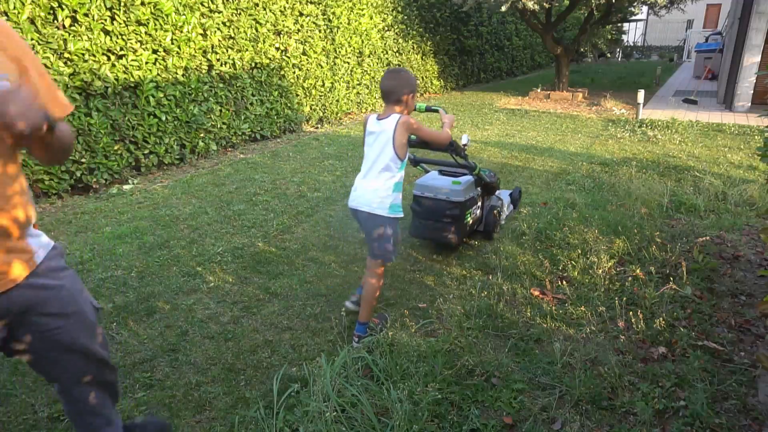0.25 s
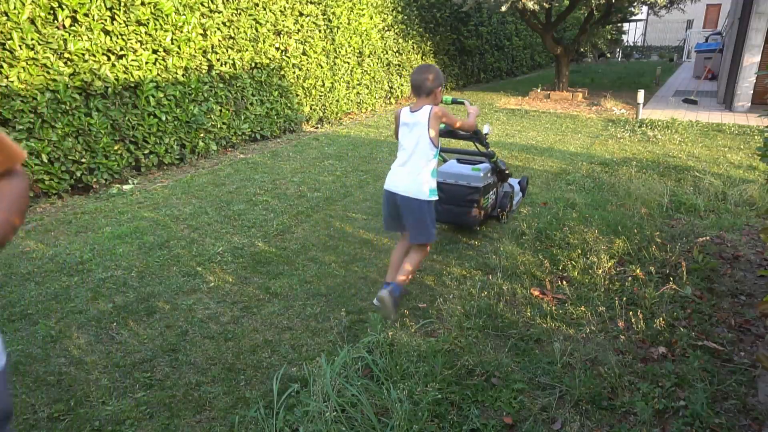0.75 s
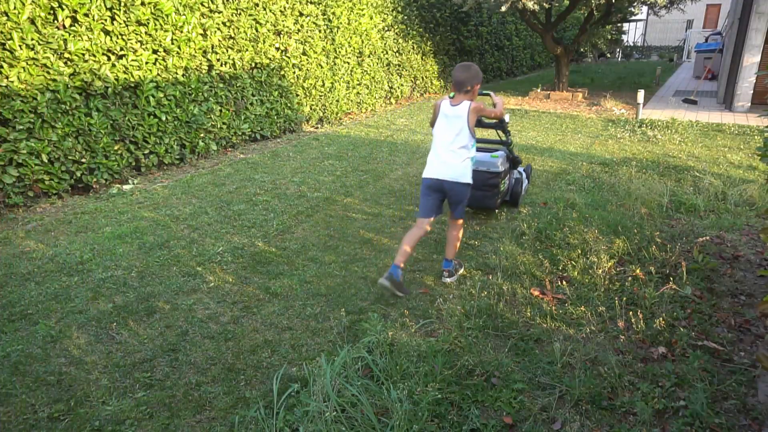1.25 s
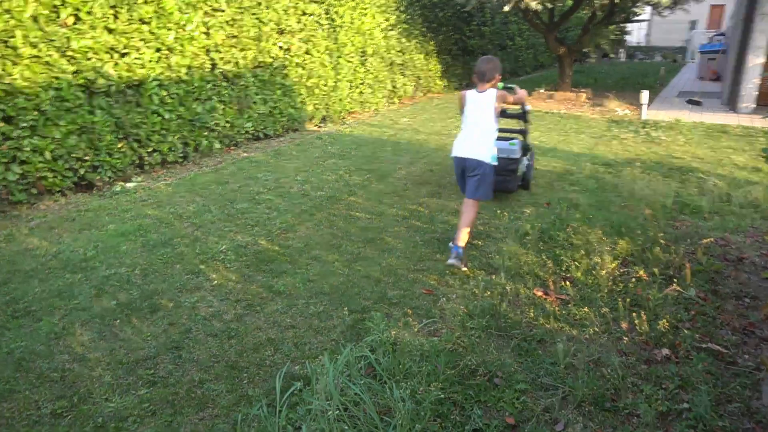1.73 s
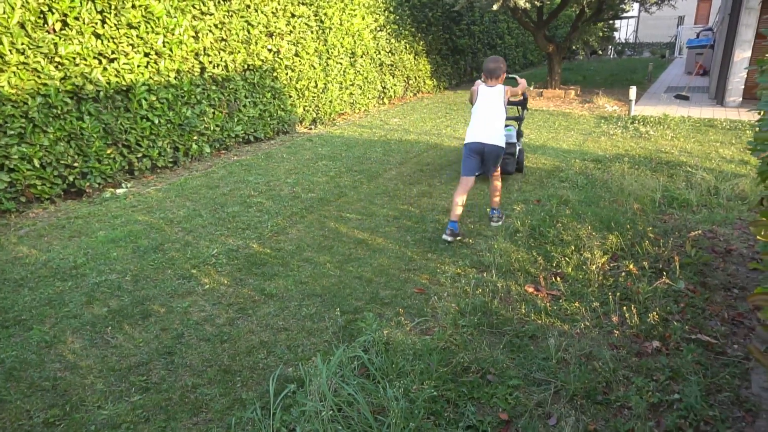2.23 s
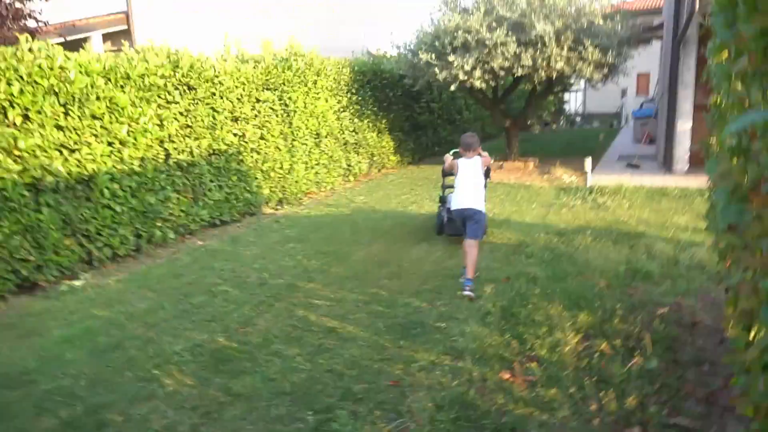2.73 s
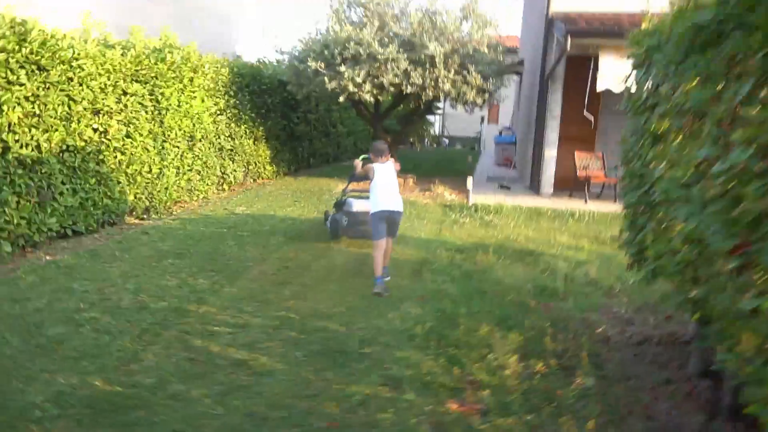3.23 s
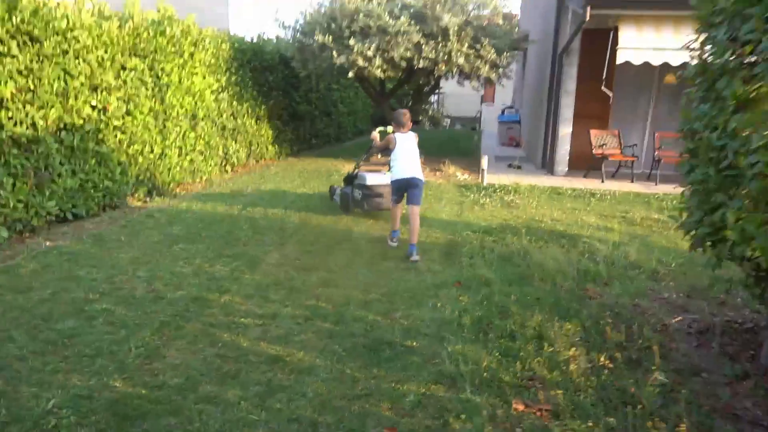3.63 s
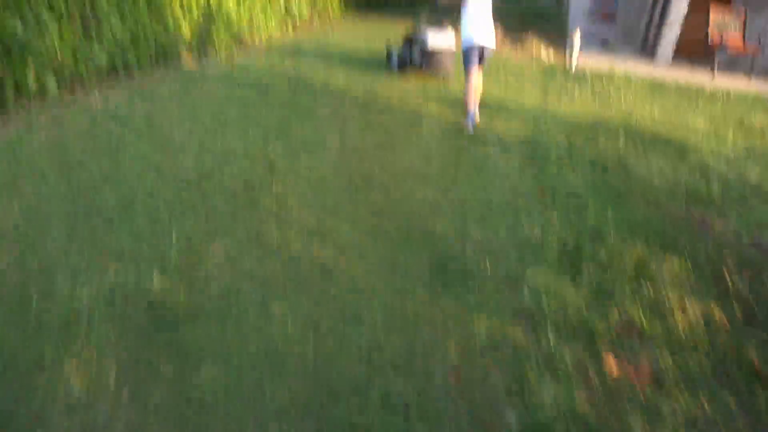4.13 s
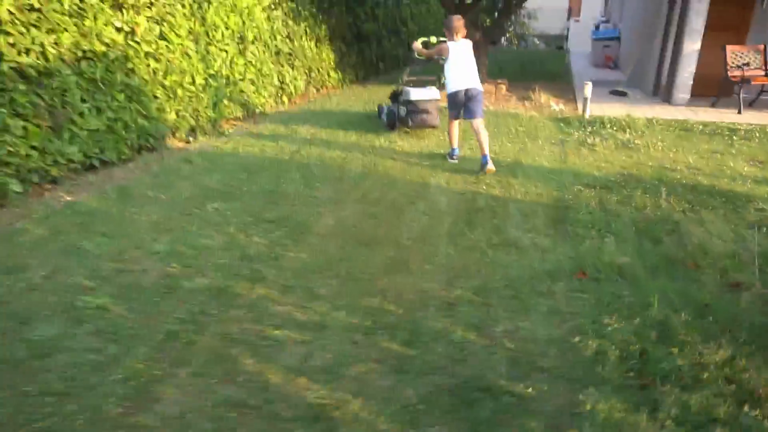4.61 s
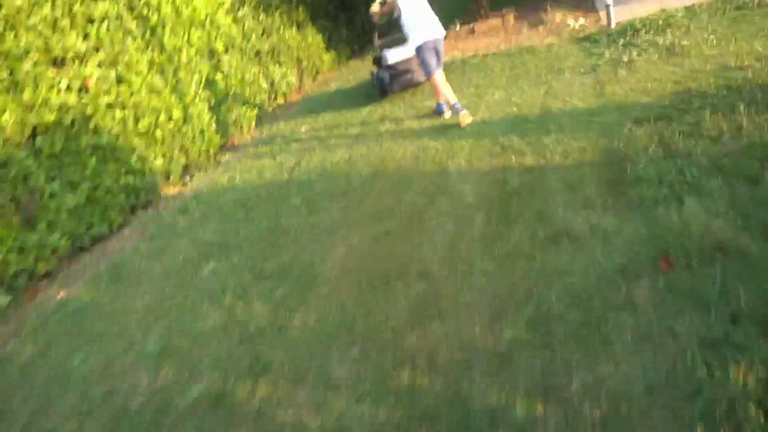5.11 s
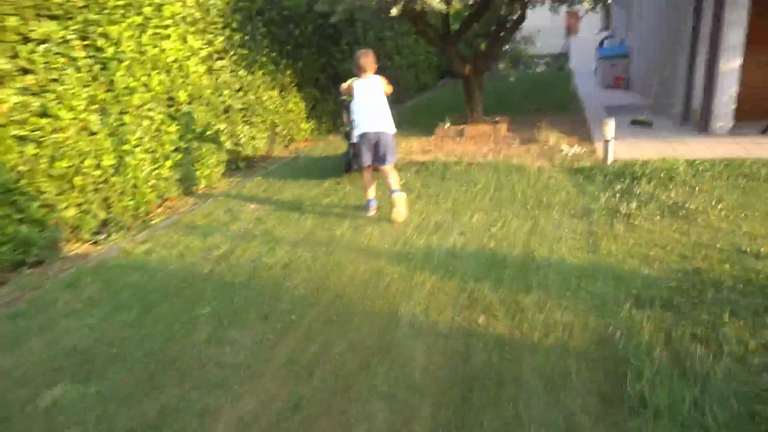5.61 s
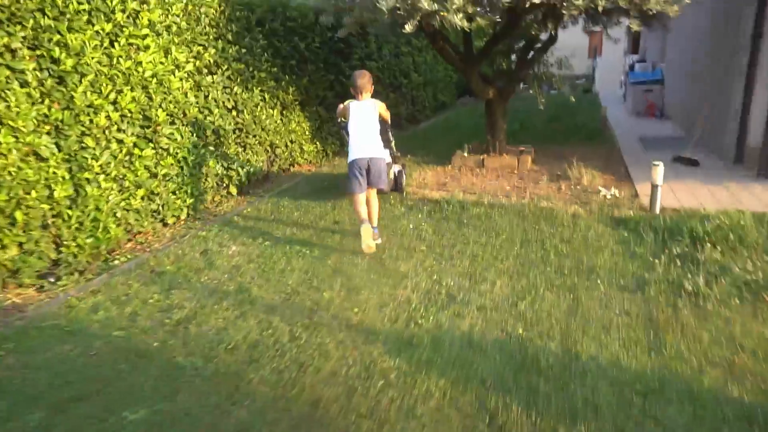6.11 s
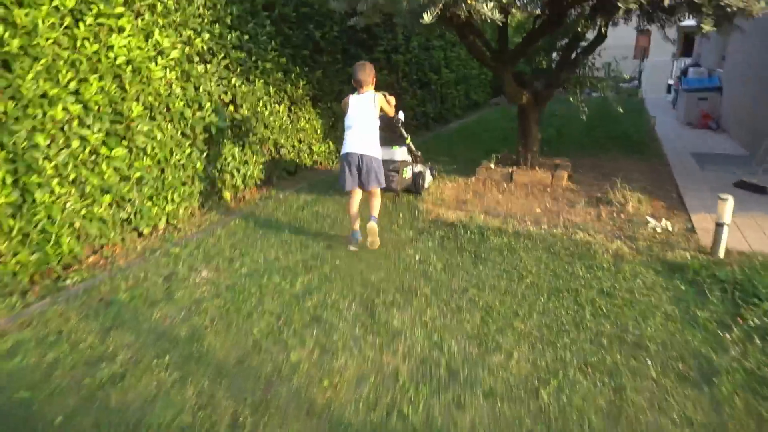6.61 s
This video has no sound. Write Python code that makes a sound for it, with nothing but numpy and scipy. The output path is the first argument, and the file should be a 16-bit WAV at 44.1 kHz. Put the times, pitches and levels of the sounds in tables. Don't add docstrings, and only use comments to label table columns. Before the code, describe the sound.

A battery lawn mower hums steadily across grass while footsteps swish behind it, a twig snaps, and wind thumps the bare microphone.

```python
import sys
import numpy as np
from scipy import signal
from scipy.fft import rfft, irfft, next_fast_len
from scipy.io import wavfile
from scipy.ndimage import uniform_filter1d

SR = 44100
rng = np.random.default_rng(int(sys.argv[2]) if len(sys.argv) > 2 else 0)


def nominal_scale(level):
    x = np.asarray(level, float) / 20
    return 10 ** x


def output_pcm(signal):
    pcm = np.clip(np.atleast_2d(signal).T, -1, 1) * 32767
    wavfile.write(sys.argv[1], SR, np.round(pcm).astype(np.int16))


N = 302251
T = np.arange(N) / SR

# time_s, deck_nearness_db, outlet_db (how openly it faces the camera)
MOWER_PATH = [(0.0, -25.5, -27), (1.03, -25.5, -27.5), (1.37, -25, -28), (1.83, -26, -29.5),
              (2.17, -27, -30.5), (2.42, -28.5, -31.5), (2.59, -28, -32.5), (3.18, -29.5, -33.5),
              (3.43, -28.5, -32), (3.59, -29, -32), (3.91, -29, -33), (4.56, -29.5, -33),
              (4.84, -28.5, -33), (5.19, -29, -31.5), (5.42, -27.5, -31), (5.8, -28.5, -32.5),
              (6.49, -29.5, -31), (6.85, -30.5, -29.5)]


def level(x):
    return x / np.sqrt(np.mean(x ** 2))


def columns(table):
    time_s, *rest = np.vstack(table).T
    return [np.interp(T, time_s, column) for column in rest]


def colour(x, points):
    hz, db = np.transpose(points)
    size = next_fast_len(N)
    bin_hz = np.arange(size // 2 + 1) * SR / size
    gain = nominal_scale(np.interp(np.log(bin_hz + 1), np.log(hz), db))
    return level(irfft(rfft(x, size) * gain, size)[:N])


def ring(x, hz, width_hz):
    b, a = signal.iirpeak(min(hz, .45 * SR), hz / width_hz, fs=SR)
    return signal.lfilter(b, a, x)


def walk(rate):
    hold = int(SR / rate)
    steps = np.repeat(rng.standard_normal(N // hold + 1), hold)
    return level(uniform_filter1d(uniform_filter1d(steps, hold), hold)[:N])


def burst(at, t60):
    return (T >= at) * nominal_scale(-60 * np.maximum(T - at, 0) / t60)


def swells(rows, edge):
    t = T[::64]
    humps = sum(height * np.exp(-np.abs(2 * (t - s) / length) ** edge) for s, length, height in rows)
    return np.interp(T, t, humps)


def grains(rate, spread_db):
    chance = rng.random((2, N))
    size_db = spread_db * np.minimum(-np.log(chance[1]), 3)
    hits = chance[0] < rate / SR
    return level(hits * nominal_scale(size_db) * np.clip(rng.standard_normal(N), -1.2, 1.2))


def patchy(x, depth_db, width_bins, hold_frames):
    strips = signal.stft(x, nperseg=1024)[2]
    field = rng.standard_normal(strips.shape)
    for way, reach in enumerate((width_bins, hold_frames)):
        field = uniform_filter1d(uniform_filter1d(field, reach, axis=way), reach, axis=way)
    return signal.istft(strips * nominal_scale(depth_db * level(field)), nperseg=1024)[1][:N]


def mower():
    # centre_s, length_s, level_db
    first_beats = [
        (2.4, 0.2, 1),
        (2.96, 0.47, -2),
        (3.73, 0.043, -12),
        (3.95, 0.51, 1.5),
        (5.0, 0.42, 2.5),
        (5.95, 1, -5),
        (6.62, 0.53, -24),
    ]
    second_beats = [(.15, 0.35, 2), (.36, 0.15, -2), (.85, 0.61, 2.5), (1.2, 0.11, -1), (1.7, 0.33, 2.5),
                    (2.15, 0.11, 0.5), (2.37, 0.32, -2), (2.65, 0.11, -5), (3.0, 0.29, -5.5),
                    (3.39, 0.085, 5), (3.64, 0.12, 5.5), (4.27, 0.095, 7), (4.48, 0.065, 2),
                    (4.69, .12, -2), (4.95, 0.13, 2.5), (5.25, .12, 0), (5.47, 0.1, -3.5), (5.61, 0.098, 2),
                    (5.73, 0.11, 3.5), (5.88, .09, -6), (5.98, .12, 5.5), (6.09, .08, -3), (6.22, 0.12, 5),
                    (6.35, .06, -1), (6.41, 0.073, 2.5), (6.7, 0.41, 4.5)]
    third_beats = [(.11, .15, 9), (.62, 0.25, 10.5), (1.0, 0.26, 7), (1.2, 0.092, -9), (1.5, 0.46, 6),
                   (1.9, 0.18, 8), (2.1, .12, 5), (2.38, .18, -1), (2.53, 0.11, 12), (3.2, 0.59, 3),
                   (3.65, 0.11, 2), (4.0, 0.57, -6), (5.17, .08, -7), (5.8, 0.11, -18), (6.07, .07, -11),
                   (6.17, 0.16, 10), (6.72, 0.15, 12)]
    fourth_beats = [(.78, .12, 7), (1.09, 0.13, 9), (1.33, 0.16, 11), (1.9, 0.064, 16), (2.12, 0.13, 6),
                    (2.47, 0.34, 12), (2.88, 0.053, 16), (3.63, 0.18, 14.5), (4.9, 1, 8), (5.5, 0.66, 6.5),
                    (5.99, 0.091, 8), (6.36, 0.28, 12.5), (6.62, 0.067, 14), (6.85, .11, 12)]
    fifth_beats = [
        (.3, 0.61, 5.5),
        (1.0, .3, -1),
        (1.5, 0.093, 12),
        (1.8, .2, 11),
        (2.4, .15, 9),
        (2.9, .3, 8),
        (3.2, 0.11, 13),
        (4.0, .15, 4),
        (4.9, 0.75, 7),
        (6.5, .6, 4),
    ]
    # multiple of the blade rate, level_db against the deck air
    overtones = [(6, -17.5), (7, -20), (8, -32), (9, -22), (10, -22), (13, -26), (30, -40)]
    # pitch_hz, density_db
    deck_spectrum = [(35, -36), (62, -18), (140, -13), (260, -8.5), (450, -12), (800, -14), (1000, -30.5),
                     (1500, -87)]
    # pitch_hz, density_db
    outlet_spectrum = [(400, -58), (750, -15), (900, 0), (1020, 1), (1400, -3), (1900, -10.5), (2200, -10),
                       (2550, -14), (2800, -22.5), (4500, -42)]
    blade_hz = 99.78
    deck_db, outlet_db = columns(MOWER_PATH)

    first_db = deck_db + 1 + swells(first_beats, 5.2) + 0.5 * walk(11)
    second_db = deck_db + 4 + swells(second_beats, 1.3) + 0.7 * walk(21.9)
    third_db = deck_db - 11 + swells(third_beats, 1.3) + 1.16 * walk(18)
    fourth_db = deck_db - 16 + swells(fourth_beats, 2.1) + 3.2 * walk(15)
    fifth_db = deck_db - 17 + swells(fifth_beats, 3.1) + 3.0 * walk(18)
    turn = 2 * np.pi * blade_hz * T + 0.23 * walk(1.514)
    tones = nominal_scale(first_db) * np.sin(turn)
    tones += nominal_scale(second_db) * np.sin(2 * turn + 1)
    tones += nominal_scale(third_db) * np.sin(3 * turn + 0.73 * walk(9))
    tones += nominal_scale(fourth_db) * np.sin(4 * turn + 0.5 * walk(5.06))
    tones += nominal_scale(fifth_db) * np.sin(5 * turn + 0.65 * walk(9))
    for k, db in overtones:
        tones += nominal_scale(deck_db + db + 4.4 * walk(10)) * np.sin(round(k) * turn + 0.7 * walk(12) + k)

    puffs = nominal_scale(0.4 * walk(20)) * (1 + 0.17 * np.cos(turn) + 0.05 * np.cos(2 * turn))
    deck_air = patchy(rng.standard_normal(N), 1.1, width_bins=2, hold_frames=5)
    deck = colour(puffs * nominal_scale(0.88 * walk(11)) * deck_air, deck_spectrum)
    outlet_air = patchy(rng.standard_normal(N), 1.3, width_bins=2, hold_frames=5)
    outlet = colour(puffs * nominal_scale(0.4 * walk(10)) * outlet_air, outlet_spectrum)
    return np.sqrt(2) * tones + nominal_scale(deck_db + 1.5) * deck + nominal_scale(outlet_db + 0.5) * outlet


def rustle():
    # centre_s, length_s, level_db
    swishes = [(.5, 0.81, -50.5), (0.96, 0.022, -46), (1.0, 0.013, -49), (1.176, 0.46, -52),
               (1.448, 0.1, -46), (1.61, .2, -53), (1.856, 0.33, -46), (1.98, 0.037, -54),
               (2.136, 0.11, -46), (2.385, 0.14, -61), (2.562, 0.03, -59), (3.13, 0.045, -60),
               (3.33, 0.13, -61), (3.775, 0.15, -47), (3.968, 0.048, -54), (4.098, 0.16, -52),
               (4.365, 0.33, -45.5), (4.557, 0.037, -56), (4.66, 0.16, -56), (4.85, 0.13, -47.5),
               (4.99, 0.15, -47), (5.334, 0.051, -41.5), (5.44, 0.12, -45), (5.53, .04, -49),
               (5.605, 0.028, -48), (5.862, 0.51, -51), (6.107, 0.035, -45), (6.22, 0.16, -45),
               (6.37, 0.013, -39), (6.45, .03, -51), (6.814, 0.035, -51), (6.653, 0.7, -45.5)]
    still_db = -65.5
    return nominal_scale(still_db) + swells([(s, length, nominal_scale(db)) for s, length, db in swishes], 2.7)


def bag():
    # pitch_hz, density_db
    clippings = [(1700, -53), (2800, 2.5), (3500, 2), (4800, -0.5), (6300, -3.5), (6900, -4.5), (8700, -3),
                 (9500, -8.5), (10500, -16.5), (13000, -15), (15500, -28)]
    aim, stir = 1.598, 0.11
    outlet_db = columns(MOWER_PATH)[1]
    hiss = nominal_scale(1.2 * walk(40)) * (rng.standard_normal(N) + 0.3 * grains(2500, spread_db=1.6))
    return nominal_scale(13 + aim * outlet_db) * rustle() ** stir * colour(hiss, clippings)


def eddies():
    # centre_s, length_s, peak_db, swing_hz
    single_eddies = [(0.992, 0.11, -18, 32), (1.765, 0.054, -4, 23), (1.823, 0.047, -9, 26),
                     (1.873, 0.09, -15, 27.2), (2.021, 0.098, -5, 23), (2.145, 0.14, -6, 21.5),
                     (2.205, 0.034, -11, 33), (2.364, 0.15, -16, 32), (2.48, 0.23, -18, 22.0),
                     (2.568, 0.15, -9.5, 32), (4.082, 0.06, -12, 25), (2.829, 0.096, -9.5, 25),
                     (3.005, 0.08, -3.5, 25.3), (3.025, 0.1, -18, 60), (3.054, 0.052, 0, 31),
                     (3.15, 0.15, -16, 24), (3.181, 0.061, -3, 19), (3.228, 0.07, -6, 40),
                     (3.315, 0.08, -7, 26), (3.624, 0.072, -14, 45), (3.663, 0.11, -12.9, 24),
                     (3.81, 0.041, -5, 27), (3.87, 0.034, 1, 28), (4.372, 0.12, -14, 21),
                     (4.482, 0.04, -7, 26), (4.574, 0.15, -13.5, 31), (4.772, 0.11, -13, 23.6),
                     (5.04, 0.16, -23, 27.2), (5.336, 0.092, -8.5, 26), (5.483, 0.057, -4, 13),
                     (5.548, 0.11, -16, 43), (5.57, 0.07, -3, 22), (5.613, 0.045, -11, 46),
                     (5.678, 0.084, -5, 23), (5.735, 0.072, -8, 57), (5.831, 0.037, -10.5, 36),
                     (5.946, 0.087, -9, 35), (5.983, 0.04, -15, 30), (6.025, 0.03, -10, 47.8),
                     (6.068, 0.19, -9.5, 37), (6.096, 0.045, -10.5, 67), (6.209, 0.045, -15, 45),
                     (6.271, 0.044, -8, 32), (6.297, 0.03, -5, 54), (6.34, 0.03, 3, 30),
                     (6.33, 0.12, -15.5, 101), (6.399, 0.042, -9, 40), (6.588, 0.17, -20, 27),
                     (6.741, 0.045, -14, 58), (6.766, 0.083, -8, 29)]
    t = T[::16]
    push = np.zeros(len(t))
    for s, length, db, hz in single_eddies:
        push += nominal_scale(db) * np.exp(-(2 * (t - s) / length) ** 2) * np.cos(2 * np.pi * hz * (t - s))
    return np.interp(T, t, push)


def wind():
    # time_s, strength_db
    breeze = [(0.0, -18.5), (0.3, -31), (0.55, -23), (0.88, -45), (0.93, -20), (1.55, -31.5), (1.75, -16),
              (2.31, -17), (4.1, -20), (4.64, -11), (4.83, -17.5), (5.47, -13.5), (5.6, -4.5), (5.7, -14.5),
              (6.16, -8.5), (6.58, -23.5), (6.75, -9.5), (6.85, -17)]
    # centre_s, length_s, level_db
    gust_rows = [(0.0, .05, -28), (.3, .5, -36), (.62, .12, -27), (1.003, .12, -32), (1.2, .2, -32),
                 (1.5, .15, -36), (1.78, 0.1, -12), (2, 0.22, -22), (2.217, 0.032, -11), (2.42, .11, -19),
                 (2.595, .09, -11), (2.847, 0.073, -14.5), (3.033, 0.19, -13), (3.164, 0.059, -6.5),
                 (3.22, 0.081, -10.5), (3.347, 0.15, -13), (3.42, 0.11, -18), (3.625, 0.1, -21),
                 (3.725, 0.06, -9), (3.863, 0.19, -16), (4.07, .1, -20), (4.2, 0.1, -25), (4.43, 0.26, -24),
                 (4.6, 0.12, -17), (4.88, 0.077, -18.5), (5.15, 0.13, -25), (5.338, 0.09, -11),
                 (5.43, 0.11, -18), (5.573, 0.2, -9.5), (5.726, 0.11, -9), (5.83, .08, -14),
                 (5.907, 0.084, -9.5), (6.093, 0.19, -10), (6.325, 0.2, -10), (6.212, 0.066, -13.5),
                 (6.5, 0.11, -14), (6.664, 0.039, -14), (6.763, 0.06, -13.5)]
    lull_db, buffet_db = -47, -5
    flap_db, flap_hz, flap_growth = -6, 70.5, 1.96
    slow = colour(rng.standard_normal(N),
                  [(3, -32), (7, 0.0), (16, 4.5), (22, -4), (36, -10), (90, -68), (300, -150)])
    quick = colour(rng.standard_normal(N), [(20, -28), (33, 12.0), (45, 2), (70, -2.5), (110, -37),
                                            (170, -78), (400, -73), (1500, -150)])
    slow /= np.sqrt(uniform_filter1d(slow ** 2, SR // 8)) + 0.66
    quick /= np.sqrt(uniform_filter1d(quick ** 2, SR // 20)) + 0.17
    gusts = nominal_scale(lull_db) + swells([(s, length, nominal_scale(db)) for s, length, db in gust_rows], 3.4)
    flap = level(ring(ring(rng.standard_normal(N), flap_hz, 40), flap_hz, 40))
    push = nominal_scale(columns(breeze)[0] + 7) * slow
    push += nominal_scale(buffet_db) * gusts * quick
    push += eddies()
    push += nominal_scale(flap_db) * gusts ** flap_growth * flap
    return 1.1 * np.tanh(push / 1.1)


def feet():
    # pitch_hz, density_db
    grass = [(3000, -22), (5000, 0.5), (6600, -5.5), (8800, 0.5), (9800, -6.5), (10900, -9), (11800, -6),
             (13200, -5), (14300, -8), (15000, -16), (15800, -9)]
    # start_s, peak_db, centre_hz
    ticks = [(0.9522, -25, 8260), (1.0006, -28, 5380), (1.1258, -21, 8940), (1.1812, -21, 8440),
             (1.3134, -20, 8330), (1.4177, -17, 7040), (1.5564, -21, 8170), (1.6531, -24, 7860),
             (1.7533, -13, 7500), (1.7595, -24, 7300), (1.77, -27, 8500), (1.819, -17, 8130),
             (2.5626, -22, 6900), (2.654, -29, 7300), (3.9694, -26, 5400), (4.0238, -29, 7140),
             (4.2315, -24, 7480), (4.4398, -23, 6180), (4.8314, -25, 5830), (4.9811, -25, 8770),
             (5.5947, -26, 8850), (5.68, -28, 5240), (5.711, -26, 9090), (5.8716, -30, 5140),
             (5.905, -28, 5120), (6.2042, -15, 7400), (6.3664, -24, 7370), (6.4358, -26, 8520),
             (6.4727, -23, 8630), (6.5256, -28, 5070), (6.6086, -21, 8400), (6.6404, -15, 8800),
             (6.7999, -22, 8440)]
    brushing = rng.standard_normal(N) + 1.1 * grains(1200, spread_db=3.0)
    swish = colour(nominal_scale(2.2 * walk(90)) * brushing, grass)
    out = nominal_scale(0.5 + 2.3 * walk(45)) * rustle() * swish
    noise = rng.standard_normal(N)
    for s, db, hz in ticks:
        i = slice(int(s * SR), int(s * SR) + SR // 20)
        width_hz = 0.32 * hz
        snap = noise[i] * burst(s, 0.019)[i]
        out[i] += nominal_scale(db - 1.5) * ring(ring(snap, hz, width_hz), hz, width_hz)
    return out


def noise_swells():
    # centre_s, level_db, centre_hz,
    # width_hz, length_s
    short_noises = [(1.764, -17.5, 276, 210, 0.012), (1.757, -20.5, 460, 250, 0.013),
                    (2, -23.5, 2400, 1500, 0.0017), (1.6, -27.5, 4800, 3000, .0015),
                    (2.3, -30, 3800, 2500, .0015), (1.761, -18, 970, 1200, 0.0046),
                    (2.772, -35, 2400, 500, 0.0035), (2.785, -18, 1950, 600, 0.0011),
                    (5.9, -33, 4900, 6000, .0012), (6.752, -27, 8000, 8000, .001), (4.6, -40, 8600, 5000, .0015),
                    (2.809, -23, 590, 550, .004), (2.865, -30, 5800, 900, 0.0018), (2.816, -38, 3570, 300, .018),
                    (2.911, -35, 5350, 700, 0.0035), (0.55, -29, 540, 160, .1), (.27, -29, 1000, 190, 0.077),
                    (4.35, -38, 1260, 330, 0.43), (4.742, -30, 1400, 600, 0.023), (5.06, -36.5, 1340, 500, 0.31),
                    (6.317, -36, 2100, 700, 0.036), (6.673, -28.5, 1110, 400, 0.039)]
    noise = rng.standard_normal(N)
    out = np.zeros(N)
    for s, db, hz, width_hz, length in short_noises:
        scrape = level(ring(ring(noise, hz, width_hz), hz, width_hz))
        out += nominal_scale(db) * np.exp(-((T - s) / length) ** 2) * scrape
    return out


def crackles():
    # start_s, peak_db
    dry_blades = [(0.9298, -39), (0.9527, -33), (1.0001, -29), (1.1258, -36), (1.1817, -39), (1.3134, -31),
                  (1.4172, -34), (1.5569, -43), (1.7534, -21), (1.8048, -37), (1.8193, -37), (1.8362, -37),
                  (1.9679, -34), (3.9694, -35), (4.126, -41), (4.2318, -40), (4.353, -39), (4.4862, -34),
                  (4.6049, -40), (4.7955, -36), (4.8589, -38), (4.9561, -32), (4.9806, -35), (5.2599, -38),
                  (5.3238, -37), (5.4924, -39), (5.5947, -28), (5.68, -35), (5.7099, -38), (5.8731, -39),
                  (5.9429, -42), (6.0387, -42), (6.0571, -40), (6.103, -34), (6.1674, -38), (6.2073, -31),
                  (6.2557, -39), (6.2642, -39), (6.351, -34), (6.3659, -33), (6.4393, -35), (6.4504, -34.5),
                  (6.4727, -32), (6.5006, -31), (6.5246, -33), (6.5879, -32), (6.6089, -29), (6.6398, -27),
                  (6.6584, -32), (6.6714, -34), (6.7032, -32), (6.7114, -34), (6.7184, -38), (6.7511, -26),
                  (6.7685, -34), (6.7989, -32), (6.8099, -31), (6.8294, -28)]
    centre_hz, width_hz, t60_s = 13200, 3100, 0.017
    pops = sum(nominal_scale(db + 4) * burst(s, t60_s) for s, db in dry_blades) * rng.standard_normal(N)
    return ring(ring(pops, centre_hz, width_hz), centre_hz, 1.5 * width_hz)


def twig():
    # level_db, t60_s
    stages = [
        (-9, 0.035),
        (-28.5, 0.31),
    ]
    # pitch_hz, level_db, t60_s
    modes = [(1900, -9, 0.027), (2260, -3, 0.024), (2410, -6, 0.027), (2720, -3, .02), (3140, -2, .022),
             (3545, -7, 0.027), (4640, 0.5, 0.022), (4870, -4, .02), (5500, -0.5, .02), (5980, 1, 0.019),
             (6500, 5, 0.014), (6760, -8, .014), (9200, -15, .025), (10400, -8, .014)]
    # pitch_hz, density_db
    bark = [(1000, -44), (1750, -30), (1900, 1), (2060, -16), (2240, 0), (3190, -9), (3600, -10),
            (4050, -16), (4500, -4), (5760, -4), (7000, -11), (8000, -11.5), (12900, -13), (15500, -23)]
    # start_s, level_db, pitch_hz, t60_s
    thumps = [
        (1.75, -17, 238, 0.12),
    ]
    snap_s, wood_db = 2.7776, -8.5
    (crack_db, crack_t60), (splinter_db, splinter_t60) = stages
    crack = nominal_scale(crack_db) * burst(snap_s, crack_t60) * colour(rng.standard_normal(N), bark)
    splinters = nominal_scale(splinter_db) * burst(snap_s, splinter_t60)
    splinters *= 1 + 1.7 * np.exp(-((T - snap_s - 0.033) / 0.014) ** 2)
    bits = splinters * level(ring(colour(rng.standard_normal(N), bark), 6200, 6700))
    wood = np.zeros(N)
    for hz, db, t60 in modes:
        swing = np.sin(2 * np.pi * hz * (T - snap_s) + 6 * rng.random())
        wood += nominal_scale(wood_db + db) * burst(snap_s, t60) * swing
    knocks = sum(nominal_scale(db) * burst(s, t60) * np.sin(2 * np.pi * hz * (T - s)) for s, db, hz, t60 in thumps)
    split = nominal_scale(-9) * burst(snap_s, 0.0078) * ring(rng.standard_normal(N), 9000, 12000)
    return split + wood + crack + bits + knocks


def scene():
    # centre_s, length_s, depth_db
    chokes = [
        (2.79, 0.024, -5.5),
        (5.474, 0.015, -70),
        (5.507, 0.01, -5),
        (5.568, 0.0033, -29),
        (5.668, 0.012, -6.5),
        (5.896, 0.0038, -27),
        (6.274, 0.003, -17),
        (6.341, 0.0036, -30),
        (6.353, 0.02, -3.5),
        (6.756, 0.0066, -52),
    ]
    choke_db = sum(db * np.exp(-(2 * (T - s) / length) ** 6) for s, length, db in chokes)
    airborne = mower() + bag() + feet() + noise_swells() + crackles()
    return (airborne * nominal_scale(choke_db) + twig() + wind())[None]


def low_pass(x):
    return signal.sosfilt(signal.butter(12, 15860, fs=SR, output="sos"), x)


def record(dry):
    top_cut = signal.ellip(10, 0.2, 70, 15900, fs=SR, output="sos")
    mix = signal.sosfilt(top_cut, np.clip(dry, -0.97, 0.97))
    return low_pass(mix)


dry = scene()
out = record(dry)
output_pcm(out)
```